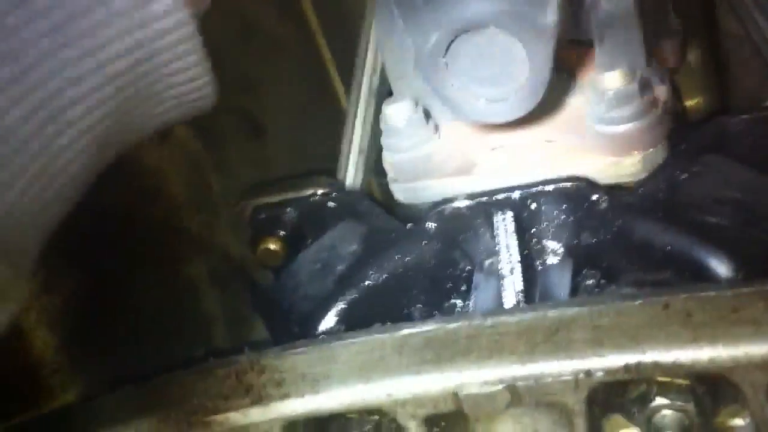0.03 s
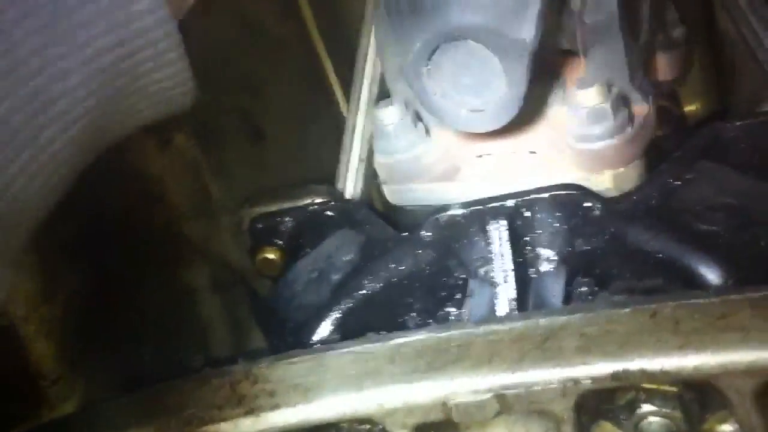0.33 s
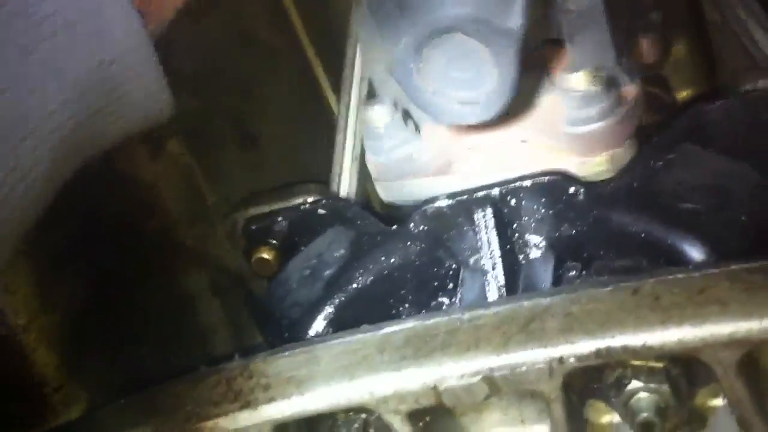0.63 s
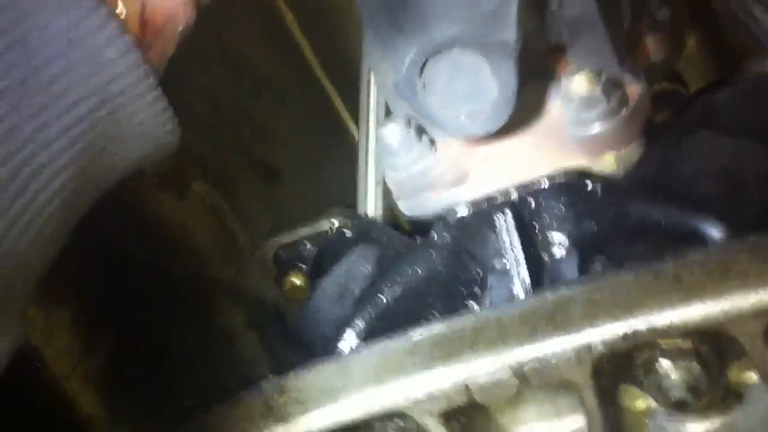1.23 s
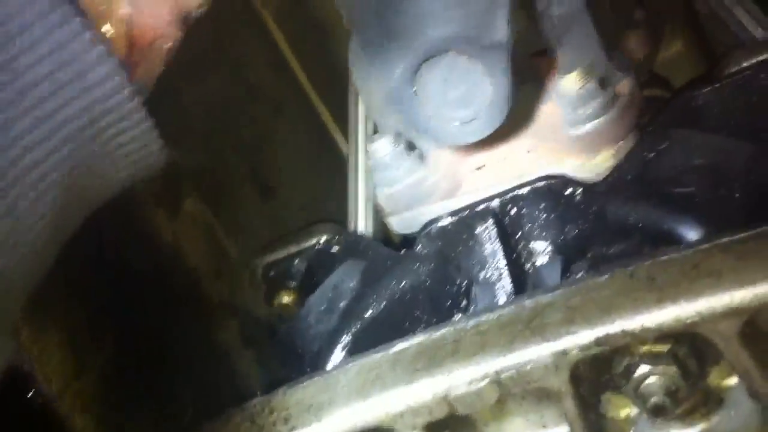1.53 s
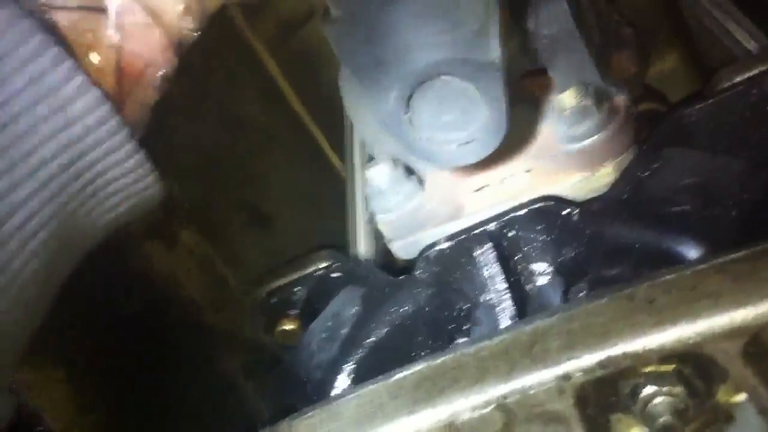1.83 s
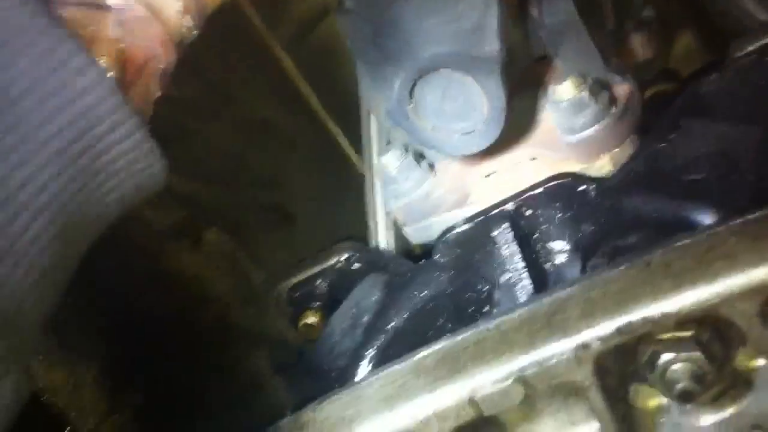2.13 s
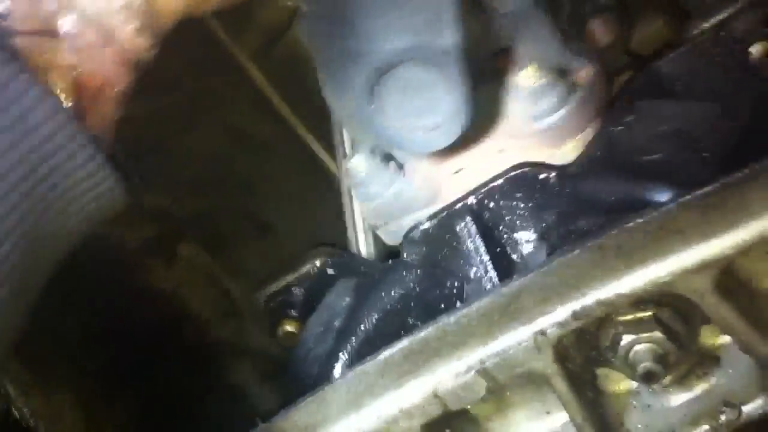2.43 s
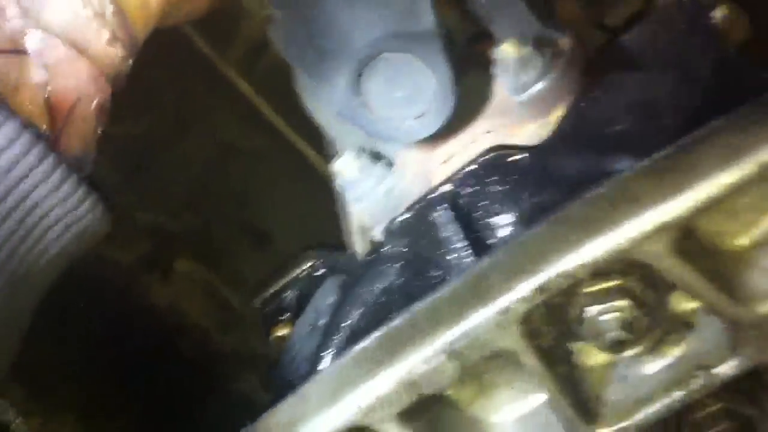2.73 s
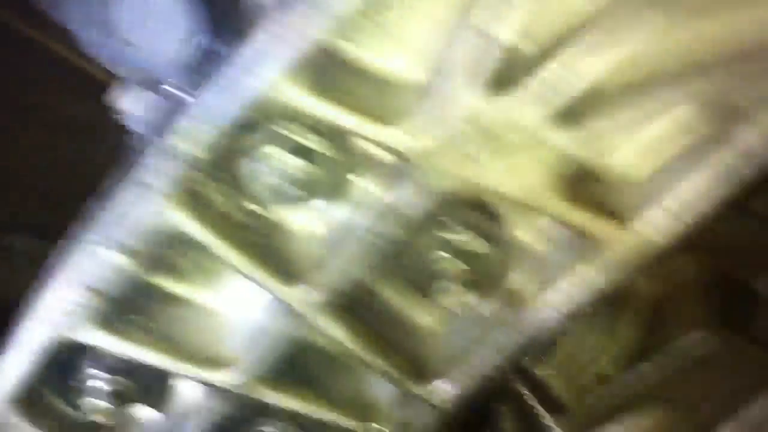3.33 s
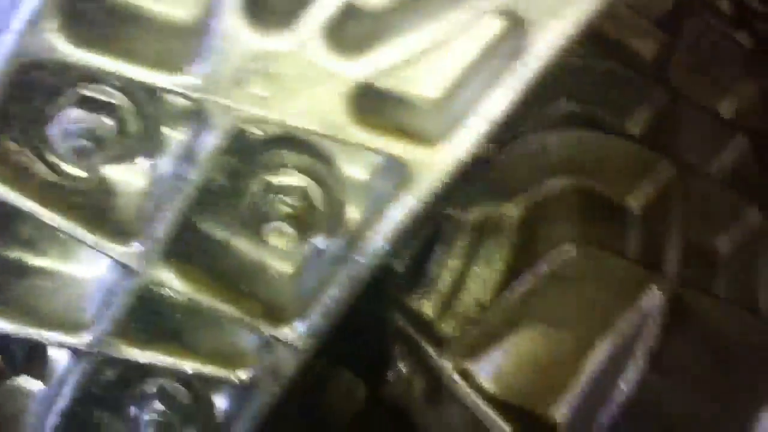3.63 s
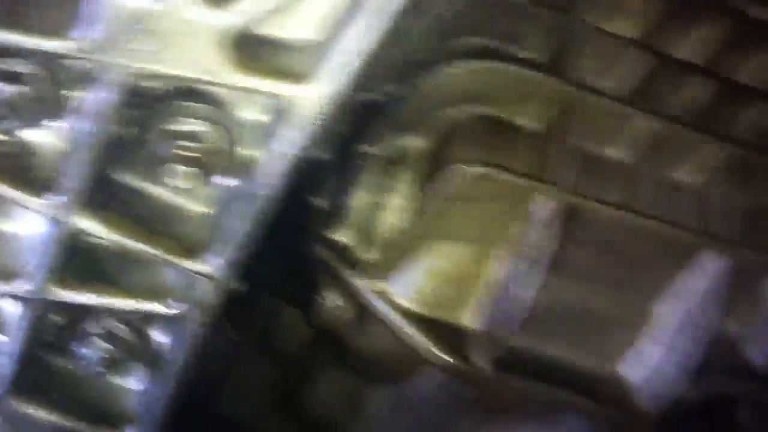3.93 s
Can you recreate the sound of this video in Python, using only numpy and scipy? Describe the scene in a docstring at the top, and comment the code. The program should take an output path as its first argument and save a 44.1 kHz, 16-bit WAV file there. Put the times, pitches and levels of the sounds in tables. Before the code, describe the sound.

Loose drivetrain parts knock and tick in an even metallic rattle under a car.

```python
"""A metallic rattle, 4.5 strokes a second, close to the microphone under a car in a workshop.
A worn drivetrain is turning slowly: on each stroke the parts take up slack, scrape, then knock home.
Heavy strokes are followed by a dull thud, light ones by a sharp rebound tick.
The underbody and the workshop ring on. A low hum and a soft rustle of handling lie beneath,
and a faint whirr grows towards the end."""
import sys
import numpy as np
from scipy import signal
from scipy.fft import rfft, irfft
from scipy.io import wavfile

SR = 44100
rng = np.random.default_rng(int(sys.argv[2]) if len(sys.argv) > 2 else 0)


def output_pcm(signal):
    """Save a mono or channel-first signal as 16-bit PCM at the path in sys.argv[1].

    Samples are clipped to [-1, 1] before scaling.
    """
    pcm = np.clip(np.atleast_2d(signal).T, -1, 1) * 32767
    wavfile.write(sys.argv[1], SR, np.round(pcm).astype(np.int16))


N = 176400

# parts knocking home; boom, ring and ping are relative to the level
# (time [s], level [dB], housing boom [dB], shaft ring [dB], tooth ping [dB], shaft pitch [Hz])
KNOCKS = [(0.1124,-36.5,-1,4,2,1710), (0.3228,-36,5,-0.5,3,1733), (0.5567,-39,-5,5.5,-0.5,1705),
          (0.7637,-34,-11,4,-2,1741), (0.9963,-39.5,2,7,4,1705), (1.2136,-37,-1,0,-2,1713),
          (1.4353,-41,4.5,8.5,0,1715), (1.6603,-35.5,6,4,-3,1744), (1.887,-41,-6,7.5,2.5,1713),
          (2.1061,-37,7,1,-4,1733), (2.3445,-40,1,5.5,2.5,1720), (2.5423,-33.5,-0.5,0.5,-1,1725),
          (2.7742,-43.5,2.5,8.5,3,1725), (2.9883,-38,3.5,-3,-1.5,1753), (3.2297,-44,-8,7,6,1794),
          (3.4364,-36.5,3,-11,1,1770), (3.6347,-42.5,-4,4,7,1620), (3.8653,-42.5,14.5,-21,12.5,1630)]
# scrapes leading into the knocks (time [s], length [s], level [dB])
SCRAPES = [(0.1017,0.0084,-36.5), (0.3155,0.0072,-37), (0.545,0.014,-39), (0.7545,0.013,-39),
           (0.983,0.011,-39), (1.204,0.019,-39.5), (1.4225,0.011,-35.5), (1.651,0.012,-36),
           (1.875,0.012,-38.5), (2.0987,0.009,-40.5), (2.332,0.012,-40), (2.533,0.008,-34.5),
           (2.761,0.018,-38.5), (2.9775,0.014,-39), (3.2157,0.0085,-35), (3.4265,0.0049,-34),
           (3.623,0.022,-37.5), (3.8577,0.011,-33)]
# rebounds after light strokes (time [s], level [dB], relative ring [dB], relative snap [dB])
TICKS = [(0.1242,-39,-1,-1.5), (0.5692,-40.5,1,6), (1.009,-40,2.5,7), (1.4486,-39,1,3.5),
         (1.9007,-38,0,-1.5), (2.3587,-39,0,0), (2.7877,-40.5,0,0), (3.2427,-40.5,0,1),
         (3.648,-38.5,-12,2.5)]
# parts dropping back, taking up slack and settling (time [s], level [dB])
THUDS = [(0.3665, -40), (0.806, -43), (1.253, -43), (1.702, -40.5), (2.15, -48), (2.584, -43.5),
         (3.025, -50.5), (3.472, -43.5), (3.905, -39)]
BUMPS = [(0.085,-52), (0.2995,-43.5), (0.526,-55), (0.7375,-42.5), (0.964,-56.5), (1.1875,-52), (1.403,-52),
         (1.633,-44), (1.857,-55.5), (2.0815,-46.5), (2.311,-51.5), (2.5145,-42), (2.741,-58), (2.956,-46),
         (3.192,-50), (3.4065,-43), (3.602,-52), (3.8395,-51)]
SETTLES = [(.342, -41), (.781, -48), (1.231, -48), (1.676, -51), (2.129, -46), (2.559, -43), (3.010, -52),
           (3.453, -45), (3.882, -41)]
# casing modes (frequency [Hz], t60 [s], then level [dB] in a knock, scrape, tick, bump and thud)
CASING_MODES = [(438.6, 0.044, -9.5, -7, -3, 1.5, 2), (661, 0.047, -18, -4.5, -1, -9, -12),
                (793, 0.19, -11.5, -23, -12, -9.5, -7), (1006, 0.034, 8.5, -25, -7, -4, -13),
                (1131, 0.027, 7.5, -15, 0, 6, -19), (1738, 0.089, -18, -1.5, -3.5, -10, -36),
                (3466, 0.094, -8.5, -6.5, -26, -20, -29), (4910, 0.02, -40, -0.5, -10, -38, -39),
                (6520, 0.058, -35, -8.5, -9, -40, -36)]
# spectra of the contact chatter (frequency [Hz], relative level [dB])
KNOCK_COLOUR = [(40, -54), (120, -19), (250, -13), (450, -11), (750, -8), (1050, -3), (1400, -3),
                (2200, -7), (4000, -12.5), (5200, -19), (7700, -17), (10000, -49), (13000, -25.5),
                (17000, -58)]
SCRAPE_COLOUR = [(40, -36), (120, -14), (300, -6), (700, 4), (1200, -5), (2200, -2), (3300, 2), (5000, 0),
                 (7300, -9.5), (9500, -20), (13000, -21.5), (17000, -27)]
TICK_COLOUR = [(40, -12), (120, -17), (250, 2.5), (700, -3), (1400, 1.5), (2800, -6.5), (5000, -3.5),
               (6600, -8), (8200, -18), (10500, -30), (13200, -12.5), (17000, -30)]
SNAP_COLOUR = [(60, -36), (1000, -6), (3000, 5), (5000, 3), (6700, 6.5), (8300, -3), (10500, -22.5),
               (13200, -2), (15500, -13), (17000, -37)]
THUD_COLOUR = [(30, -29), (100, -4.5), (200, -2), (470, -6), (800, -5), (1400, -11.5), (2400, -14),
               (4000, -25.5), (8000, -30), (17000, -53)]
BUMP_COLOUR = [(30, -45), (100, -22), (300, -6), (600, 17), (1100, -7), (1800, -11), (4000, -26),
               (8000, -34), (17000, -51)]
# spectra of the underbody reflections and the workshop tail (frequency [Hz], relative level [dB])
UNDERBODY_COLOUR = [(40, -18), (200, 2.5), (600, 4.5), (1100, 2), (1800, 4.5), (4000, -1), (7000, -12.5),
                    (11000, -30), (17000, -9)]
WORKSHOP_COLOUR = [(25, -30), (70, -16), (125, 4.5), (210, 12), (320, -2.5), (420, -6.5), (700, -4.5),
                   (1700, -16.5), (4000, -15.5), (8000, -19), (16000, -30)]
# decay of the workshop tail (frequency [Hz], t60 [s])
WORKSHOP_T60 = [(100, 0.45), (250, 0.62), (700, 0.23), (2000, 0.41), (5000, 0.31), (16000, .15)]
# handling rustle (time [s], length [s], level [dB], treble tilt [dB/octave])
RUSTLES = [(1.781, 0.16, -57, 10), (3.08, 0.075, -54.5, -2.5), (3.195, .14, -54.5, -2.5),
           (3.57, 0.22, -68, -5)]
# spectra of the room tone and the whirr (frequency [Hz], relative level [dB])
ROOM_TONE_COLOUR = [(25, -26), (55, -15), (80, -11), (120, 0), (180, 2), (300, -7.5), (500, -4.5),
                    (800, -9.5), (1300, -9), (2200, -18), (3500, -20), (6000, -24.5), (10000, -26.5),
                    (13000, -24.5), (17000, -28)]
WHIRR_COLOUR = [(60, -27), (400, -20), (650, -9), (900, 2), (1100, 3.5), (1360, 1), (1700, -7), (3000, -20),
                (8000, -25), (17000, -54)]
# their rise and fall (time [s], level [dB])
ROOM_TONE_LEVEL = [(0, -55), (1, -56), (2, -55), (3.2, -55.5), (3.6, -52), (4, -55)]
WHIRR_LEVEL = [(0, -86), (3.3, -67), (3.48, -61.5), (3.75, -56), (4, -60)]
# narrow hums (frequency [Hz], width [Hz], level [dB])
HUMS = [(120.5, 9, -73.5), (229.5, 19, -67), (776, 11.5, -66), (1344, 16, -75.5)]
# swell shared by the hums (time [s], gain [dB])
HUM_SWELL = [(0, 1.5), (1.5, -1), (3.3, 1), (3.55, 2), (4, 7.5)]

BAND_LIMIT_HZ = 17300


def knock(db, boom_db, ring_db, ping_db, shaft_hz):
    """The parts slam together close to the microphone: housing, shaft and teeth ring briefly."""
    housing = amp(4 + boom_db) * mode(hz=668, t60=0.06)
    shaft = amp(7 + ring_db) * mode(shaft_hz, t60=0.051, rise_s=0.0014)
    teeth = amp(7.5 + ping_db) * mode(hz=4014, t60=0.023, rise_s=0.00089)
    body = casing("knock", rise_s=0.00038)
    contact = amp(3) * chatter(blow(rise_s=0.00024, t60=0.061), KNOCK_COLOUR)
    return amp(db) * (housing + shaft + teeth + body + contact)


def scrape(length, db, rise_s=0.0018, release_s=0.0044, catch_s=0.004):
    """Metal slides on metal for about a hundredth of a second and catches once on the way."""
    t = clock()
    release = np.exp(-np.maximum(t - 0.77 * length, 0) / release_s)
    envelope = (1 - np.exp(-t / rise_s)) * release
    slide = amp(0.5) * chatter(envelope, SCRAPE_COLOUR) + casing("scrape", rise_s=0.0032)
    catch = amp(-6.5) * chatter(blow(rise_s=0.00028, t60=0.025), SNAP_COLOUR)
    add(slide, catch_s, catch)
    return amp(db) * slide


def tick(db, ring_db, snap_db):
    """A hard rebound: a bright snap, a short crack and a thin ring."""
    snap = amp(3.5 + snap_db) * chatter(blow(rise_s=0.00027, t60=0.013), SNAP_COLOUR)
    crack = amp(5) * chatter(blow(rise_s=0.00019, t60=0.051), TICK_COLOUR)
    body = casing("tick", rise_s=0.00048)
    ring = amp(3 + ring_db) * mode(hz=3478, t60=0.08)
    return amp(db) * (snap + crack + body + ring)


def thud(db):
    """The parts drop back with a low, hollow note."""
    hollow = amp(10) * mode(hz=484.3, t60=0.051, rise_s=0.0012)
    body = amp(2) * casing("thud", rise_s=0.0017)
    contact = amp(3.5) * chatter(blow(rise_s=0.0018, t60=0.051), THUD_COLOUR)
    return amp(db) * (hollow + body + contact)


def bump(db):
    """Taking up the slack gives the housing a cushioned nudge."""
    housing = amp(14) * mode(hz=653, t60=0.04, rise_s=0.0029)
    body = amp(-0.5) * casing("bump", rise_s=0.0022)
    contact = amp(-1) * chatter(blow(rise_s=0.00058, t60=0.084), BUMP_COLOUR)
    return amp(db) * (housing + body + contact)


def settle(db):
    """The scraping faces touch once more, lightly, after a heavy knock."""
    return amp(db) * chatter(blow(rise_s=0.001, t60=0.05), SCRAPE_COLOUR)


def casing(kind, rise_s, spread_db=2, detune=0.015):
    """The casing's modes as one kind of blow excites them, never twice alike."""
    column = ("knock", "scrape", "tick", "bump", "thud").index(kind)
    ring = 0
    for hz, t60, *levels in CASING_MODES:
        gain = amp(levels[column] + spread_db * rng.standard_normal())
        pitch = hz * (1 + detune * rng.uniform(-1.05, 1))
        ring += gain * mode(pitch, t60, rise_s)
    return ring


def chatter(envelope, colour, spread_db=3, grain_samples=16):
    """Many tiny contacts of uneven size under an envelope."""
    grain_db = spread_db * rng.standard_normal(len(envelope) // grain_samples)
    grit = np.repeat(amp(grain_db), grain_samples) * rng.standard_normal(len(envelope))
    return coloured(unit(grit) * envelope, colour)


def reflections(x, underbody_delay_s=0.011, tail_rise_s=0.008, size=32768):
    """Quick reflections off the underbody nearby, and a dull tail from the workshop beyond."""
    t = clock(size)
    burst = rng.standard_normal(size) * (t > underbody_delay_s) * decay(t, t60=0.065)
    early = coloured(burst, UNDERBODY_COLOUR)
    underbody = amp(-18.5) * early / np.linalg.norm(early)
    hz, times, bands = signal.stft(rng.standard_normal(size), SR, nperseg=512)
    fade = decay(times, spectrum_at(WORKSHOP_T60, hz)[:, None])
    fade /= np.sqrt(size * np.mean(fade ** 2, axis=1, keepdims=True))  # equal energy in each band
    bands *= fade * amp(spectrum_at(WORKSHOP_COLOUR, hz))[:, None]
    workshop = signal.istft(bands, SR)[1][:size] * np.minimum(t / tail_rise_s, 1) ** 2
    return signal.fftconvolve(x, underbody + workshop)[:N]


def rustle(length, db, tilt_db, low_hz=1000, top_hz=13000):
    """A brief brush of hand or cloth, dry at the microphone."""
    swell = np.sin(np.pi * np.minimum(clock(16384) / length, 1))
    top_db = tilt_db * np.log2(top_hz / low_hz)
    colour = [(low_hz, 0), (top_hz, top_db), (BAND_LIMIT_HZ, top_db - 3)]
    return amp(db) * chatter(swell, colour)


def background():
    """The workshop's low room tone, a soft whirr and wavering hums."""
    hz = np.fft.rfftfreq(N, 1 / SR)
    hums = sum(amp(db) * noise(1 / (1 + (2 * (hz - centre) / width) ** 2)) for centre, width, db in HUMS)
    room_tone = level(ROOM_TONE_LEVEL) * noise(amp(spectrum_at(ROOM_TONE_COLOUR, hz)))
    whirr = level(WHIRR_LEVEL) * noise(amp(spectrum_at(WHIRR_COLOUR, hz)))
    return room_tone + whirr + level(HUM_SWELL) * hums


def mode(hz, t60, rise_s=0.00028):
    """One dying partial at a random phase."""
    t = clock()
    attack = 1 - np.exp(-(t / rise_s) ** 2)
    return np.sin(2 * np.pi * (hz * t + rng.random())) * attack * decay(t, t60)


def blow(rise_s, t60):
    """Envelope with a quick attack and an exponential release."""
    t = clock()
    return (1 - np.exp(-t / rise_s)) * decay(t, t60)


def decay(t, t60):
    """Falls 60 dB in t60 seconds."""
    return np.exp(-np.log(1000) * t / t60)


def coloured(x, colour, size=2048):
    """Minimum-phase filter of unit energy with the given spectrum."""
    log_gain = np.log(amp(spectrum_at(colour, abs(np.fft.fftfreq(size, 1 / SR)))))
    taps = np.fft.ifft(np.exp(np.conj(signal.hilbert(log_gain)))).real
    return signal.fftconvolve(x, taps / np.linalg.norm(taps))[:len(x)]


def noise(gain):
    """Steady noise of rms 1, shaped by a gain per frequency."""
    return unit(irfft(rfft(rng.standard_normal(N)) * gain, N))


def spectrum_at(points, hz):
    """Interpolates on a log-frequency axis."""
    frequencies, values = np.transpose(points)
    return np.interp(np.log(hz + 1), np.log(frequencies + 1), values)


def level(points):
    """Gain curve over the scene from (time [s], level [dB]) points."""
    return amp(np.interp(clock(N), *np.transpose(points)))


def amp(db):
    """Decibels to gain."""
    return 10 ** (np.asarray(db) / 20)


def unit(x):
    """Scales to rms 1."""
    return x / np.sqrt(np.mean(x ** 2) + 1e-20)


def clock(size=8192):
    """Time axis in seconds."""
    return np.arange(size) / SR


def add(mix, start_s, sound):
    """Mixes a sound in at its start time."""
    part = mix[max(round(start_s * SR), 0):][:len(sound)]
    part += sound[:len(part)]


def scene():
    """One microphone under the car: the close rattle, its reflections, handling and background."""
    rattle, handling = np.zeros(N), np.zeros(N)
    for events, source in ((KNOCKS, knock), (SCRAPES, scrape), (TICKS, tick),
                           (SETTLES, settle), (BUMPS, bump), (THUDS, thud)):
        for start_s, *settings in events:
            add(rattle, start_s, source(*settings))
    for start_s, *settings in RUSTLES:
        add(handling, start_s, rustle(*settings))
    return (rattle + reflections(rattle) + handling + background())[None]


def record(dry):
    """The recorder's band limit."""
    lowpass = signal.firwin(511, BAND_LIMIT_HZ, window=("kaiser", 9), fs=SR)
    return signal.oaconvolve(dry, lowpass[None], "same")


dry = scene()
out = record(dry)
output_pcm(out)
```